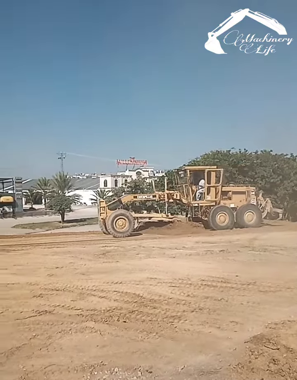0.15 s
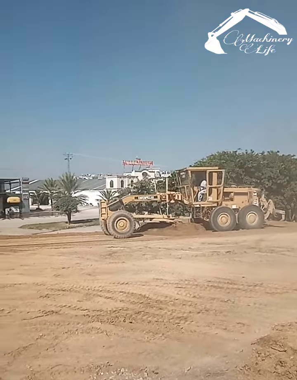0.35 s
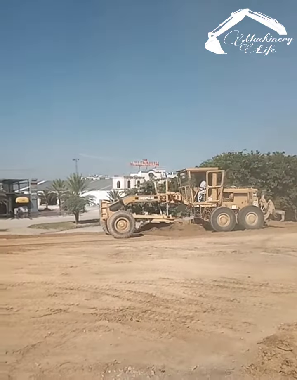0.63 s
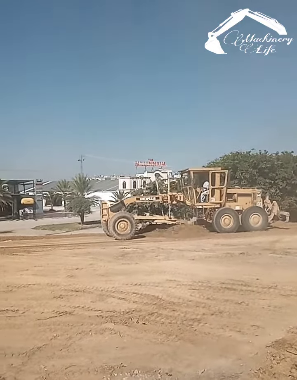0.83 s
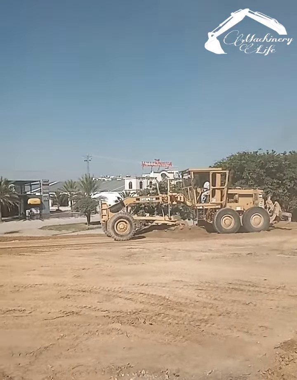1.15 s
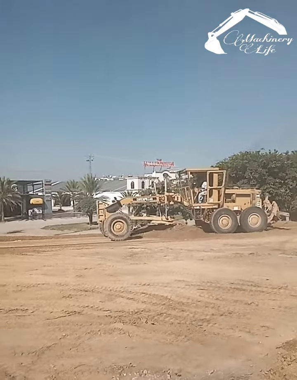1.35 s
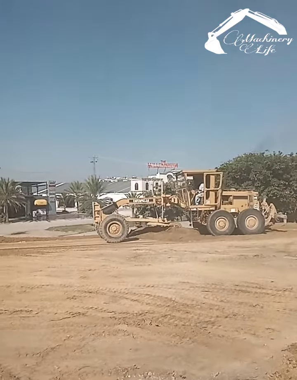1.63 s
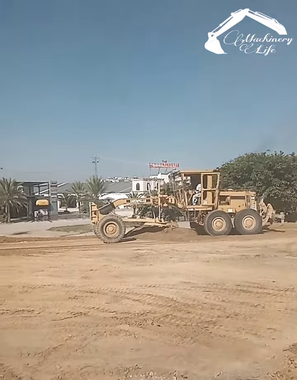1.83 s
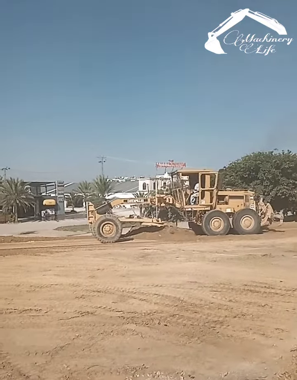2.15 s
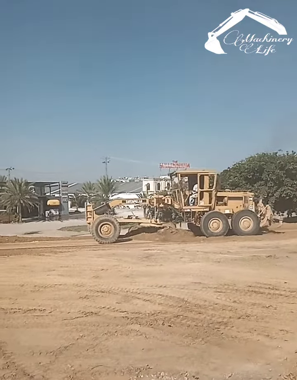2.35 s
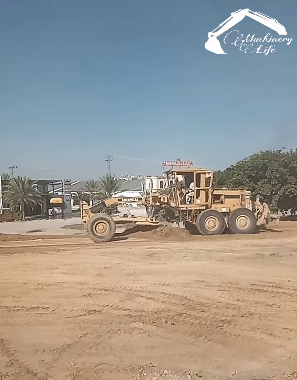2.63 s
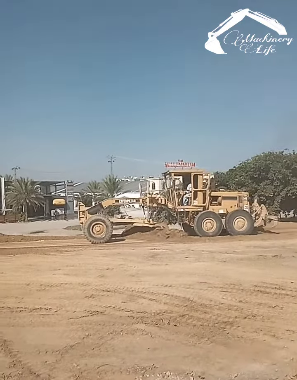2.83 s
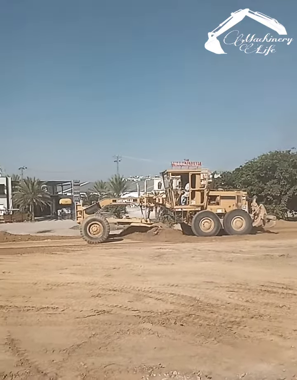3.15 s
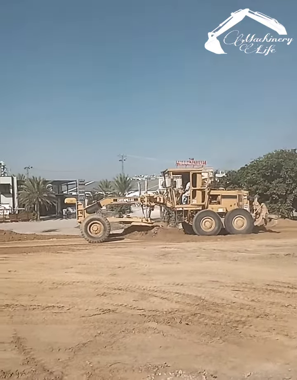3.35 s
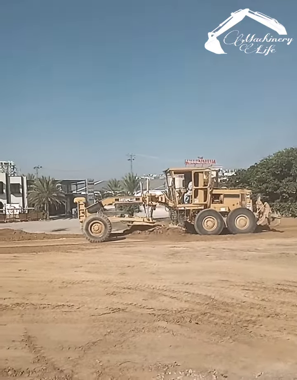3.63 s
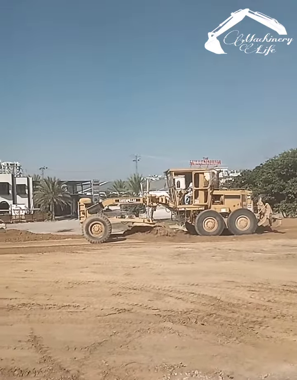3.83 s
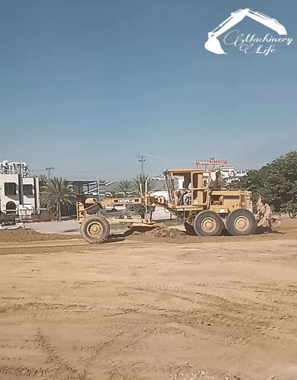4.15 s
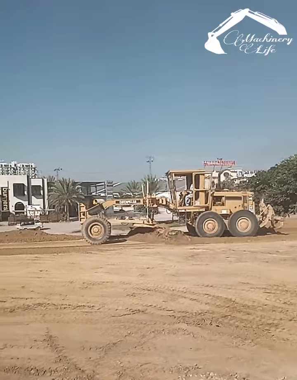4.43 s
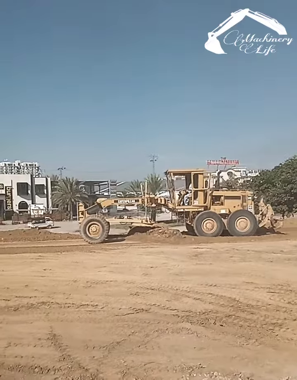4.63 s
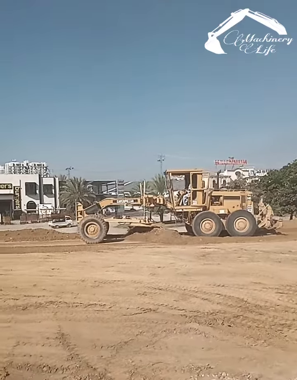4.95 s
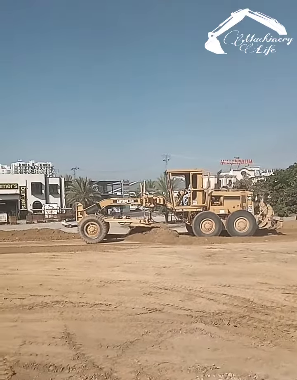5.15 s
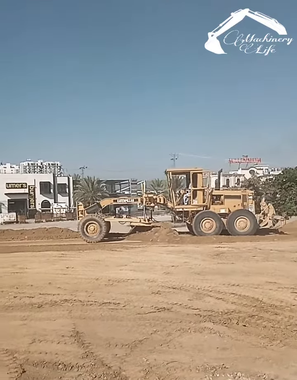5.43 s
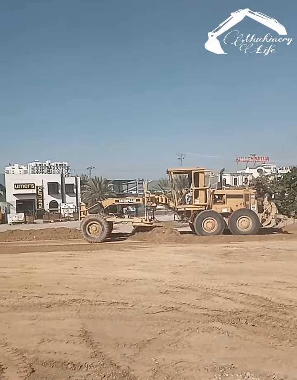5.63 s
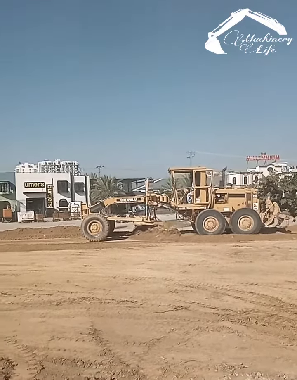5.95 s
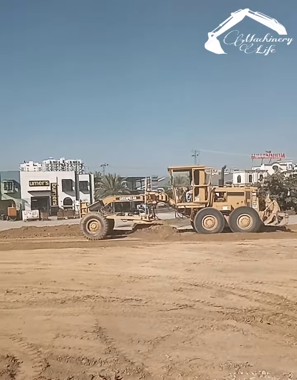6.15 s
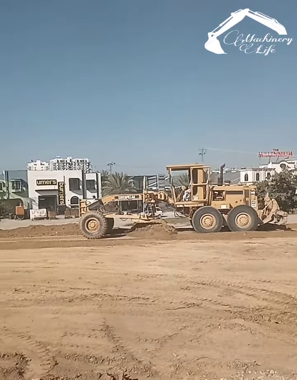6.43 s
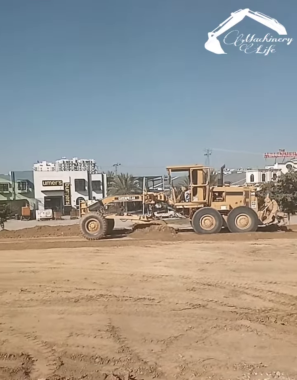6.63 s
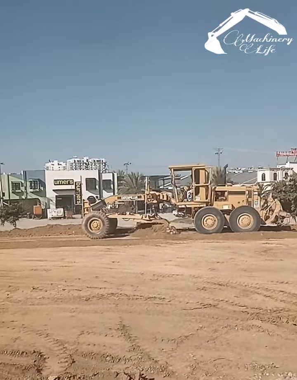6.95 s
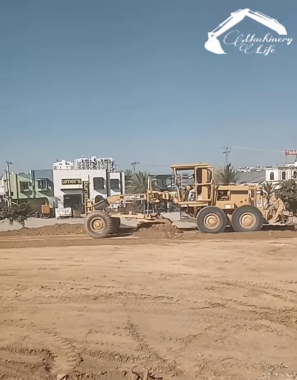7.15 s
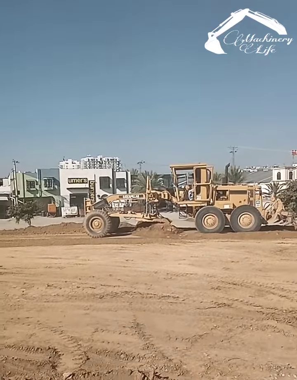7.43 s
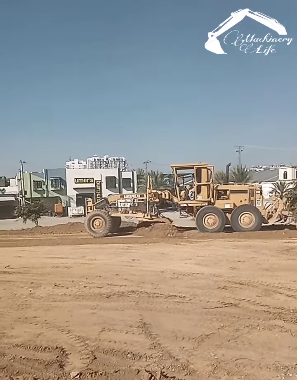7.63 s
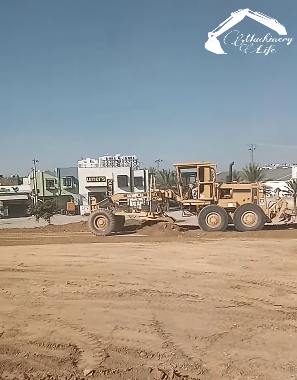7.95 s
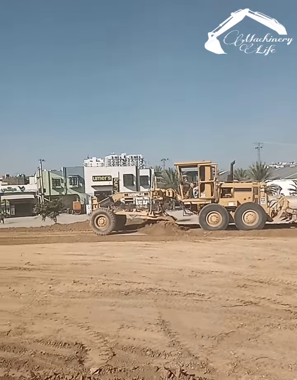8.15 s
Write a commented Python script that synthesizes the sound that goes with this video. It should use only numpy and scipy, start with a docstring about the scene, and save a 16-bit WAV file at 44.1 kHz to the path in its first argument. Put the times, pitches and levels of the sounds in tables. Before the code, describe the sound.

A grader's six-cylinder diesel labours on an open dirt lot, heard through a microphone that seems covered by a finger. At 0 s it is already half-muffled; a double bump at 0.15 s and a tick at 0.4 s, then by 0.6 s the seal tightens to a dull, unsteady drone near 80 Hz with low exhaust throb. Engine pitch sags around 1.1-1.4 s, recovers to a peak near 2 s, and sags again around 4-4.6 s. Soft thumps come at 1.8-1.9, 2.7, 3.2, 3.4 and 4.5 s, small ticks at 2.8, 3.9 and 4.05 s, over very faint thin hiss. From 4.4 s the muffling eases; at 5.0-5.2 s it opens in steps. Broad rushing hiss, hoarse turbo howl near 1.9 kHz, hollow exhaust note near 510-525 Hz, metallic clatter and rapid uneven firing knock fill the sound. The hiss swells and dips, slight gear whine grows, and the engine continues to 8.3 s.

```python
"""On a dirt lot a six-cylinder diesel grader works at full throttle; its speed sags as the blade bites.
For five seconds the microphone port is blocked, probably by a finger: a muffled drone, bumps and ticks get in.
Then the port comes free, and the hiss of fan and turbo, the hollow exhaust pipe and the firing knock open up.
Periodic sources follow one engine cycle; noise is shaped by spectra, resonances and bursts at the firings.
The port is a filter that varies with its seal; bumps are short gliding waves, ticks are leaking pressure steps."""
import sys
import numpy as np
from scipy import signal
from scipy.fft import rfft, irfft
from scipy.io import wavfile
from scipy.ndimage import map_coordinates

SR = 44100
rng = np.random.default_rng(int(sys.argv[2]) if len(sys.argv) > 2 else 0)


def generate_wav(signal):
    """Clip the signal to [-1, 1] and save it as 16-bit WAV at the path in sys.argv[1]."""
    frames = np.transpose(np.atleast_2d(signal))
    scaled = np.clip(frames, -1, 1) * 32767
    pcm = np.round(scaled).astype(np.int16)
    wavfile.write(sys.argv[1], SR, pcm)


N = 365148
TIME = np.arange(N) / SR   # s

# Engine speed, sagging while the blade bites. Each row: time in seconds, firings per second.
FIRING_RATE = [(0.1, 79.8), (0.88, 78.5), (1.11, 74.8), (1.35, 75.1), (1.6, 81.1), (2.07, 83.8),
               (2.9, 80.1), (3.3, 79.6), (4.0, 75.2), (4.58, 73.7), (5.01, 82.2), (5.46, 82.8),
               (5.86, 80.2), (6.24, 80.4), (6.8, 81.8), (7.25, 79.9), (8.15, 80.2)]
# Strength of each cylinder's knock in firing order, before scaling by each source. Each entry: level in dB.
CYLINDER_STRENGTH = [2.5, 2.2, 0.4, 0.2, -1.5, -2]
# Radiation of the parts of the passing machine. Each row: time in seconds, then the gains of exhaust,
# clatter, gear whine and drone in dB.
FACING_GAIN = [(0, 3, -5.5, -3, -2.1), (1.15, -1.5, -7.5, 0, -2), (1.7, -4.5, -9.5, 2, -0.6),
               (2.7, 3.5, 2.5, -4, -1), (4.1, -2, 0.5, -9, 0.1), (4.65, 4, -5, -8.5, -0.5),
               (5.2, -0.5, 3.5, -2, -1.2), (5.85, 1.5, 3, -4, -0.5), (6.3, 0.5, 2, 4.5, 0.5),
               (7.2, -1.5, 0.5, 1, 0), (8.27, -3, 0, 8.5, 0.5)]
# The port pressed shut, eased, then let go in steps. Each row: time in seconds, tightness of the seal
# (0 open, about 1 pressed shut).
SEAL_TIGHTNESS = [(0, 0.67), (.38, 0.78), (.58, 1.06), (1.4, 1.15), (2.6, 0.97), (3.2, 1.083), (4.3, 1.04),
                  (4.5, .73), (4.96, 0.6), (5.02, 0.32), (5.13, 0.26), (5.2, 0.055), (5.32, 0.12),
                  (5.42, 0.098), (6.3, 0.005), (6.8, 0.017), (8.27, -0.0053)]
# Gain of a port of tightness 1, without the drop above its knee. Each row: frequency in Hz, gain in dB.
SHUT_PORT_GAIN = [(60, 0.5), (140, -5.5), (220, -6.5), (500, -13.5), (800, -20.5), (1200, -21.5),
                  (1600, -26.5), (1900, -31), (2800, -40), (4200, -51), (7000, -16)]
# Limit above which the shut port drops steeply. Each row: time in seconds, knee in Hz.
PORT_KNEE = [(.4, 2330), (.6, 1910), (1.8, 1870), (2.2, 2100), (4.33, 2190), (4.45, 2560), (4.95, 2624)]
# A half-shut port booms, a tight one damps even the drone. Each row: tightness, gain of the firing tone in dB.
BOOM_GAIN = [(0, 0.5), (.25, 0), (.7, 1.5), (1.15, -4.5)]
# Spectrum of the hiss leaking round the blocked port. Each row: frequency in Hz, relative density in dB.
LEAK_SPECTRUM = [(2450, -19.5), (2680, -12), (2880, 3), (3150, 2.5), (3480, 0), (3620, -15.5),
                 (4150, -32.5), (4400, -18), (4700, -23), (5100, -34), (7000, -44.5)]
# Sparse, short blobs of faint noise between about 1.7 and 5 kHz. Each row: frequency in Hz, relative
# density in dB.
BLOB_SPECTRUM = [(1700, -7.5), (1950, 2), (2300, -5.5), (2500, -14), (2750, -3.5), (3300, -6),
                 (3720, -10.5), (3950, -16), (4200, -22), (4600, -17.5), (5200, -27.5)]
# Faint noise while the port is blocked. Each row: time in seconds, level of the hiss in dB (the blobs
# follow it), level of the narrow breathy ring of the gap in dB.
LEAK_LEVELS = [(0, -66.5, -82), (2, -63.5, -77.5), (3.6, -65.5, -67.5), (4.4, -66, -68), (4.95, -65, -63.5)]
# Sharp ticks at the port. Each row: time in seconds, pressure step in dB before filtering, brightness in Hz.
PORT_TICKS = [(0.3962, -15, 3500), (2.7963, -17, 3650), (3.9034, -13, 3680), (4.0585, -17.5, 3700)]
# Soft bumps of the finger. Each row: start in seconds, level in dB, first pitch in Hz, last pitch in Hz,
# length in seconds, share of the length spent rising.
FINGER_BUMPS = [(0.1476, -12.5, 380, 165, 0.0095, 0.42), (0.157, -14, 112, 84.5, 0.022, .35),
                (1.827, -18, 100.5, 109, 0.018, .45), (1.906, -13, 287, 90, 0.0095, .28),
                (1.9158, -21.5, 338, 300, 0.004, 0.32), (1.9175, -8, 127, 75, 0.028, .36),
                (2.708, -26, 169, 108, 0.014, .5), (3.209, -16.5, 234, 80, 0.028, 0.17),
                (3.405, -20, 195, 102, 0.0096, 0.42), (4.528, -14, 158, 95, 0.016, 0.38)]
# Hoarse howl, probably the turbo. Each row: time in seconds, centre in Hz, level in dB, rms pitch scatter in Hz.
HOWL_COURSE = [(0, 2116, -40, 50), (1.8, 2052, -34, 55), (3.4, 2017, -28, 54.8), (4.7, 1985, -27, 54.8),
               (5.6, 1933, -26.5, 48), (6.6, 1922, -29.5, 36), (7.4, 1921, -31.5, 33),
               (7.75, 1907, -32, 40), (8.27, 1904, -36, 45)]
# Broad roar of fan, turbo and block. Each row: frequency in Hz, relative density in dB.
ROAR_SPECTRUM = [(25, -17.5), (45, -10.5), (70, 2), (200, 3), (330, -1), (420, -3), (640, 1), (830, -1),
                 (1050, 0), (1500, -0.8), (1700, -0.5), (2130, -.5), (3100, -6.5), (3480, -12),
                 (3680, -17.5), (4250, -20), (5600, -49.5)]
# Faint top of the hiss. Each row: frequency in Hz, relative density in dB.
TOP_SPECTRUM = [(5500, -16.5), (5850, -0.5), (6500, 2.5), (6950, -1.5), (7600, -22), (11000, -15.5),
                (13200, -12), (15000, -24.5)]
# Gain of the high part of the rushing air as it swells and sinks. Each row: time in seconds, gain in dB.
HISS_GAIN = [(5.3, -2), (5.45, 5.5), (5.65, 3), (5.78, -1), (6.13, 1), (6.25, -5), (6.5, -3), (6.62, 1.5),
             (7.1, 1.5), (7.27, 0), (7.4, 3.5), (7.68, 2), (7.85, -0.5), (8.27, 0.5)]
# A shifting hollow, probably the echo off the ground. Each row: time in seconds, centre in Hz, gain in dB.
HOLLOW_COURSE = [(1.8, 2400, 4), (4.4, 2225, -12), (5.4, 2180, -5.5), (6.4, 2140, -0.5), (6.9, 2540, -3.5),
                 (8.27, 2600, -9)]
# Ringing of block and hood. Each row: frequency in Hz, width in Hz, level in dB before the machine's gains,
# share that repeats every cycle, delay in cycles, rise in dB per second.
PANEL_MODES = [(1100, 130, -33, 0.41, 0.11, 1.5), (2326, 170, -39.5, 0.062, 0.022, -0.5)]
# Hollow note of the exhaust pipe, its pitch drifting up and down. Each row: time in seconds, # pitch in Hz,
# level of the note in dB, level of the other resonances in dB.
PIPE_COURSE = [(0, 503, -37.5, -44.5), (1.7, 486, -40.5, -46), (2.5, 497, -31.5, -41),
               (3.1, 502, -32.5, -36), (3.7, 524, -31, -38), (4.3, 524, -31, -36), (5.2, 524, -28, -35),
               (5.8, 521, -29, -36.5), (6.4, 515.2, -28, -37), (7.3, 508.3, -30.5, -46.5),
               (8.27, 507, -30, -49)]
# The pipe's other resonances. Each row: multiple of the note, width in Hz, relative level in dB.
PIPE_OVERTONES = [(0.39, 22, 0), (1.12, 30, -1.5), (1.33, 28.04, -5), (1.475, 28, -4.5), (1.685, 27.94, -1),
                  (1.885, 30.2, -5.5)]
# Exhaust tones beside the firing tone. Each row: multiple of the two-turn cycle rate, level in dB before
# the machine's gains.
EXHAUST_TONES = [(4, -51), (5, -47), (7, -38), (8, -41), (9, -40), (10, -35.5), (11, -47), (12, -42),
                 (13, -44.5), (14, -38), (15, -36.5), (16, -41.5), (17, -49.5), (18, -42), (20, -45),
                 (21, -49), (26, -48)]

CYLINDERS = len(CYLINDER_STRENGTH)
CRUISE_HZ = 80   # firings per s under ordinary load
NEAR_S, APPROACH_DB_PER_S = 7.04, .5   # the grader draws nearer; this gain is 0 dB at NEAR_S
DRONE_DB, DRONE_DB_PER_SAG_HZ = -22.5, .28   # drone at cruise before other gains; louder when labouring
SHUT = .5   # tightness that sets where the drop above the knee comes in
GAP_RING_HZ, GAP_RING_WIDTH_HZ, HISS_WAVER_DB = 3120, 99, 1
LOW_KNOCK_DB, HIGH_KNOCK_DB = -8, -3   # burst over steady noise, before each firing's own strength
BURST_RISE, BURST_SCATTER_DB = .22, 1   # rise as a share of one firing; spread between firings
NOTE_WIDTH_HZ, PIPE_REPEAT_SHARE = 32.2, .098   # share of the gas noise that repeats every cycle
EXHAUST_WAVER_DB, EXHAUST_JITTER_RAD = 1.4, .2
EXHAUST_BOOM_SHARE = .97   # share of the port's boom that the throb gets
CUTOFF_HZ = 15500


def from_db(db):
    """Level law: decibels to amplitude gain."""
    return 10 ** (np.asarray(db) / 20)


def rms_one(x):
    """Normalisation: scale to rms 1."""
    return x / np.sqrt(np.mean(x ** 2) + 1e-20)


def in_time(rows):
    """Linear interpolation: each column of a curve at every sample."""
    s, *columns = np.transpose(rows)
    return [np.interp(TIME, s, column) for column in columns]


def at_hz(points, hz):
    """Interpolation of a spectrum along a logarithmic frequency axis."""
    corners, db = np.transpose(points)
    return np.interp(np.log(hz + 1), np.log(corners), db)


def white_noise():
    """White noise: independent random pressures."""
    return rng.standard_normal(N)


def butterworth(x, order, hz, kind="low"):
    """Butterworth filtering: a smooth pass band with one corner."""
    return signal.sosfilt(signal.butter(order, hz, kind, fs=SR, output="sos"), x)


def sine(phase):
    """Simple harmonic motion, with rms 1."""
    return np.sqrt(2) * np.sin(phase)


def drift(rate):
    """Low-passed chance: a smooth wander changing about rate times a second; spread 1."""
    hz = np.arange(N // 2 + 1) * SR / N
    return rms_one(irfft(rfft(white_noise()) / (1 + (hz / rate) ** 4), N))


def colour(x, spectrum):
    """Spectral shaping: a given spectrum with steep falls beyond its ends; rms 1."""
    hz = np.arange(1, N // 2 + 2) * SR / N
    upper_end = 1 / (1 + (hz / spectrum[-1][0] / 1.1) ** 16)
    lower_end = 1 / (1 + (.7 * spectrum[0][0] / hz) ** 4)
    return rms_one(irfft(rfft(x) * from_db(at_hz(spectrum, hz)) * upper_end * lower_end, N))


def resonate(x, hz, width_hz):
    """Resonance: a twice-applied pole in a frame turning at the centre, which may move; rms 1."""
    r = np.exp(-np.pi * 1.55 * width_hz / SR)   # 1.55 offsets the narrowing by two passes
    turn = np.exp(2j * np.pi * np.cumsum(hz * np.ones(N)) / SR)
    return rms_one(np.real(turn * signal.lfilter([1], [1, -2 * r, r * r], x / turn)))


def mottle(x, depth_db, width_hz, length_s, size=512):
    """Random modulation in time and frequency: patches swell and sink by chance; the overall level is kept."""
    hz, s, frames = signal.stft(x, SR, nperseg=size)
    places = np.meshgrid(hz / width_hz, s / length_s, indexing="ij")
    chance = map_coordinates(rng.standard_normal(frames.shape), places, order=3, mode="mirror")
    gain = from_db(depth_db * np.minimum(chance, 2))
    return np.std(x) * rms_one(signal.istft(frames * gain, SR, nperseg=size)[1][:N])


def knocks(cycle, pulse_db, unevenness):
    """Periodic modulation: loudness pulses at each firing, with each cylinder's own strength."""
    strength_db = np.interp(cycle * CYLINDERS, np.arange(CYLINDERS), CYLINDER_STRENGTH, period=CYLINDERS)
    return rms_one(from_db(unevenness * strength_db + pulse_db * np.cos(2 * np.pi * CYLINDERS * cycle)))


def combustion_bursts(cycle):
    """Impulsive combustion: each firing rises quickly and mostly dies before the next; none are quite equal."""
    firing = cycle * CYLINDERS + BURST_RISE
    number = firing.astype(int)
    age = firing % 1 / BURST_RISE   # 1 at the peak
    chance_db = BURST_SCATTER_DB * rng.standard_normal(number[-1] + 1)
    strength_db = 2 * np.take(CYLINDER_STRENGTH, number, mode="wrap") + chance_db[number]
    return from_db(strength_db) * age * np.exp(1 - age)


def repeating_noise(cycle, size=2048):
    """Periodicity: the same random rattle comes round with every engine cycle."""
    return rms_one(np.interp(cycle % 1, np.linspace(0, 1, size), rng.standard_normal(size)))


def self_noise(level_db):
    """Noise floor: steady white noise of constant level."""
    return from_db(level_db) * white_noise()


def faint_blobs(below_hiss_db):
    """Randomly modulated noise: sparse, short blobs of faint sound between about 1.7 and 5 kHz."""
    hiss_db, _ = in_time(LEAK_LEVELS)
    blobs = mottle(colour(white_noise(), BLOB_SPECTRUM), depth_db=8, width_hz=110, length_s=.025)
    return from_db(hiss_db + below_hiss_db) * blobs


def leak():
    """Filtered noise: a thin hiss and a narrow ring; random patches in time and frequency make the hiss uneven."""
    level_db, ring_db = in_time(LEAK_LEVELS)
    hiss = mottle(colour(white_noise(), LEAK_SPECTRUM), depth_db=3.5, width_hz=170, length_s=.022)
    ring = from_db(ring_db) * resonate(white_noise(), GAP_RING_HZ, GAP_RING_WIDTH_HZ)
    return ring + from_db(level_db + HISS_WAVER_DB * drift(20)) * hiss


def ticks(low_hz, snap_db, snap_hz, order=7):
    """Pressure release: a sudden step leaks away in about a millisecond; a little of its edge stays sharp."""
    out = np.zeros(N)
    for s, db, bright_hz in PORT_TICKS:
        leaking = butterworth(from_db(db) * (TIME >= s), 2, low_hz, "high") + 1e-18
        rounded = butterworth(leaking, order, bright_hz)
        edge = butterworth(leaking, 1, snap_hz)
        out += rounded + from_db(snap_db) * edge
    return out


def bumps(rub_db, rub_hz):
    """Compression of trapped air: a few waves that mostly fall in pitch, begun by a dull rub of skin."""
    out = np.zeros(N)
    rub = from_db(rub_db) * rms_one(butterworth(white_noise(), 4, rub_hz))
    for s, db, first_hz, last_hz, length, rise in FINGER_BUMPS:
        along = np.linspace(0, 1, int(length * SR))
        phase = 2 * np.pi * np.cumsum(first_hz * (last_hz / first_hz) ** along) / SR
        start = int(s * SR)
        span = slice(start, start + len(along))
        scrape = rub[span] * (1 - along) * (first_hz / rub_hz) ** 2   # quicker slips scrape more
        swell = np.sin(np.pi * np.interp(along, [0, rise, 1], [0, .5, 1]))
        out[span] += from_db(db) * swell * (scrape - np.sin(phase))
    return out


def gear_whine(cycle, level_db, order=120):
    """Tooth meshing: gears whine unevenly at a fixed multiple of the cycle rate."""
    phase = 2 * np.pi * order * cycle + .5 * drift(11)
    return from_db(level_db + 2 * drift(4.7)) * sine(phase)


def turbo_howl(cycle, rough_db):
    """Turbulent frequency modulation: a whistle scatters quickly in pitch and swells with the firings."""
    centre_hz, level_db, scatter_hz = in_time(HOWL_COURSE)
    phase = 2 * np.pi * np.cumsum(centre_hz + scatter_hz * drift(70.2)) / SR
    swell = rms_one(from_db(rough_db * drift(55)) * knocks(cycle, pulse_db=2.5, unevenness=1.1))
    return from_db(level_db) * swell * sine(phase)


def rushing_air(cycle, split_hz):
    """Modulated noise: firings swell the white noise; its high part knocks harder and swells and sinks."""
    hiss_db, = in_time(HISS_GAIN)
    bursts = combustion_bursts(cycle)
    low = butterworth(white_noise(), 2, split_hz)
    high = butterworth(white_noise(), 2, split_hz, "high")
    # steady and burst noise add in power
    low = low * rms_one(np.hypot(1, from_db(LOW_KNOCK_DB) * bursts))
    high = high * rms_one(np.hypot(1, from_db(HIGH_KNOCK_DB) * bursts))
    return low + high * from_db(hiss_db)


def roar(air, level_db, top_db):
    """Broadband radiation: fan, turbo and combustion noise as a broad roar with a faint top."""
    return from_db(level_db) * colour(air, ROAR_SPECTRUM) + from_db(top_db) * colour(air, TOP_SPECTRUM)


def clatter(cycle):
    """Forced vibration: knocks set block and hood ringing, partly alike from cycle to cycle."""
    out = np.zeros(N)
    for hz, width_hz, db, share, delay, rise_db in PANEL_MODES:
        blows = knocks(cycle - delay, pulse_db=2.0, unevenness=1.3)
        alike = resonate(blows * repeating_noise(cycle), hz, width_hz)
        fresh = resonate(blows * white_noise(), hz, width_hz)
        ringing = np.sqrt(share) * alike + np.sqrt(1 - share) * fresh
        out += from_db(db + rise_db * (TIME - NEAR_S)) * ringing
    return out


def exhaust_pipe(cycle, delay, unevenness, evenness):
    """Pipe resonance: gas noise excites modes that drift together and throb; the main note is evened out."""
    pitch_hz, note_db, others_db = in_time(PIPE_COURSE)
    alike = np.sqrt(PIPE_REPEAT_SHARE) * repeating_noise(cycle)
    gas = alike + np.sqrt(1 - PIPE_REPEAT_SHARE) * white_noise()
    note = resonate(gas, pitch_hz, NOTE_WIDTH_HZ)
    note = rms_one(note / np.abs(signal.hilbert(note)) ** evenness)   # flatten its envelope in part
    others = np.zeros(N)
    for ratio, width_hz, db in PIPE_OVERTONES:
        others += from_db(db) * resonate(gas, ratio * pitch_hz, width_hz)
    throb = knocks(cycle - delay, pulse_db=0.7, unevenness=unevenness)
    return throb * (from_db(note_db) * note + from_db(others_db) * others)


def exhaust(cycle):
    """Harmonic series: unequal cylinders put tones at multiples of the cycle rate, heard as the throb."""
    out = np.zeros(N)
    for multiple, db in EXHAUST_TONES:
        phase = 2 * np.pi * (multiple * cycle + rng.random()) + EXHAUST_JITTER_RAD * drift(10.0)
        out += from_db(db + EXHAUST_WAVER_DB * drift(4.3)) * sine(phase)
    return out


def firing_tone(cycle, level_db, waver_db):
    """Periodic discharge: the deep drone of the exhaust has one wave for each firing."""
    return from_db(level_db + waver_db * drift(24)) * sine(2 * np.pi * CYLINDERS * cycle)


def hollow(x, width_hz, size=1024):
    """Interference: a narrow band, mostly weakened, moves in pitch and changes in depth."""
    hz, s, frames = signal.stft(x, SR, nperseg=size)
    centre_hz, depth_db = [np.interp(s, TIME, column) for column in in_time(HOLLOW_COURSE)]
    gain_db = depth_db * np.exp(-((hz[:, None] - centre_hz) / width_hz) ** 2)
    return signal.istft(frames * from_db(gain_db), SR, nperseg=size)[1][:N]


def blocked_port(x, seal, drop_db, size=1024):
    """Transmission loss: a tighter seal takes more away, with a steep drop above the knee of a shut port."""
    hz, s, frames = signal.stft(x, SR, nperseg=size)
    tight = np.interp(s, TIME, seal)
    knee = np.interp(s, *np.transpose(PORT_KNEE))
    above = 1 - 1 / (1 + (hz[:, None] / knee) ** 36)
    shutting = np.tanh((tight / SHUT) ** 2)
    gain_db = tight * at_hz(SHUT_PORT_GAIN, hz)[:, None] + drop_db * above * shutting
    return signal.istft(frames * from_db(gain_db), SR, nperseg=size)[1][:N]


def scene():
    """Superposition: the grader through the port, the small sounds at the port, and faint noise."""
    firing_hz, = in_time(FIRING_RATE)
    exhaust_db, clatter_db, whine_db, carry_db = in_time(FACING_GAIN)
    seal, = in_time(SEAL_TIGHTNESS)
    sag_hz = CRUISE_HZ - firing_hz   # the load on the engine
    near_db = APPROACH_DB_PER_S * (TIME - NEAR_S)
    boom_db = np.interp(seal, *np.transpose(BOOM_GAIN))
    cycle = np.cumsum(firing_hz) / SR / CYLINDERS   # engine cycles elapsed

    faint = self_noise(level_db=-85.5) + faint_blobs(below_hiss_db=-3.5) + leak()
    finger = bumps(rub_db=-7, rub_hz=560) + ticks(low_hz=280, snap_db=-27, snap_hz=6000)

    air = rushing_air(cycle, split_hz=1710)
    machine = roar(air, level_db=-22.5, top_db=-74.0)
    machine = mottle(machine, depth_db=1.4, width_hz=160, length_s=.12)
    machine += from_db(whine_db) * gear_whine(cycle, level_db=-45.0)
    machine += turbo_howl(cycle, rough_db=4.5)
    machine += from_db(clatter_db) * clatter(cycle)
    machine += exhaust_pipe(cycle, delay=.35, unevenness=1.4, evenness=0.3)
    machine += from_db(exhaust_db + EXHAUST_BOOM_SHARE * boom_db) * exhaust(cycle)
    heard = blocked_port(from_db(near_db) * hollow(machine, width_hz=83), seal, drop_db=-17.5)

    drone_db = DRONE_DB + carry_db + near_db + DRONE_DB_PER_SAG_HZ * sag_hz + boom_db
    drone = firing_tone(cycle, drone_db, waver_db=0.22 + 0.67 * seal)   # less steady while the finger presses
    return (faint + finger + heard + drone)[None]


def record(dry):
    """Band limiting: the ends are faded over 4 ms and the top is cut by a steep elliptic filter."""
    fade = np.minimum(1, np.minimum(TIME, TIME[-1] - TIME) / .004)
    return signal.sosfilt(signal.ellip(10, .1, 80, CUTOFF_HZ, fs=SR, output="sos"), dry * fade)


dry = scene()
out = record(dry)
generate_wav(out)
```